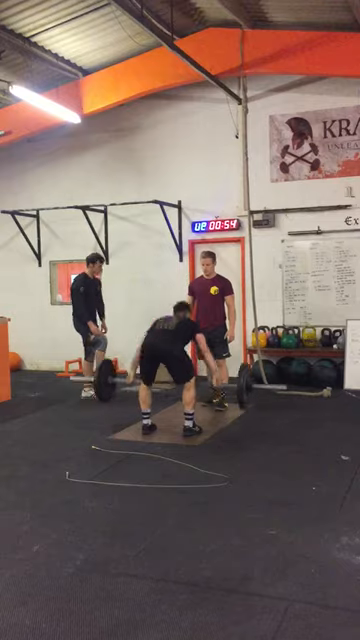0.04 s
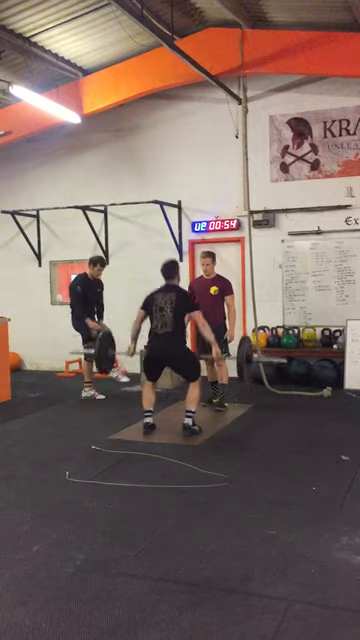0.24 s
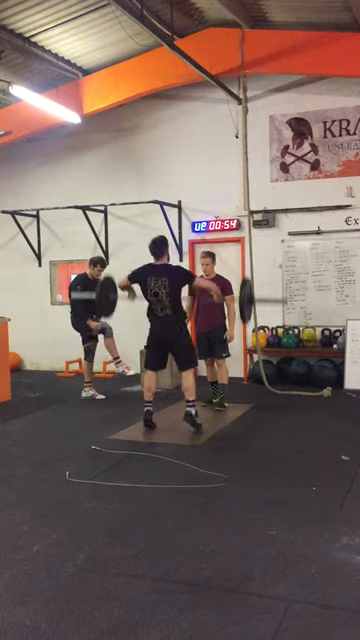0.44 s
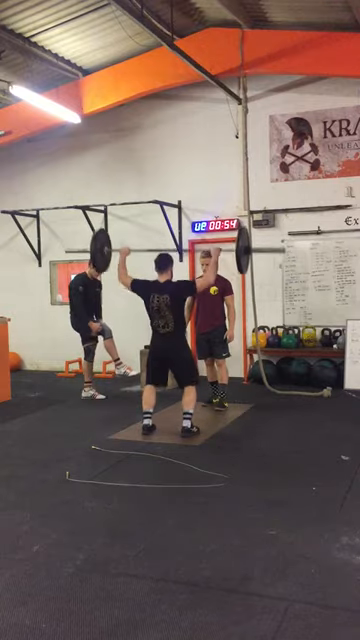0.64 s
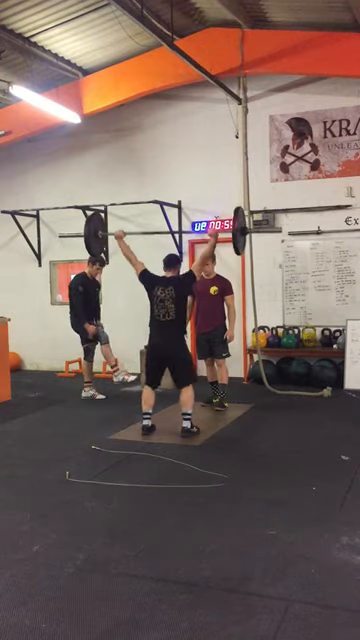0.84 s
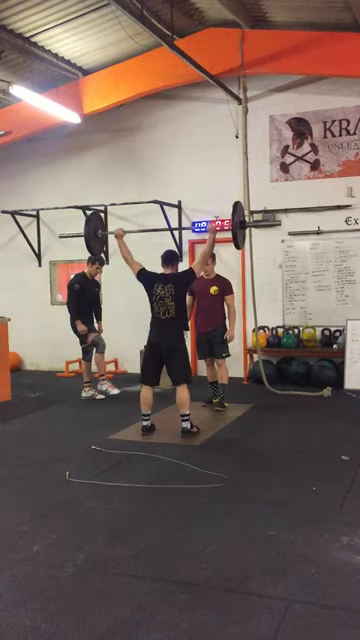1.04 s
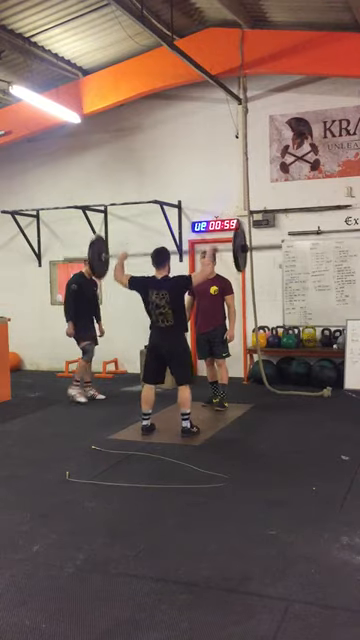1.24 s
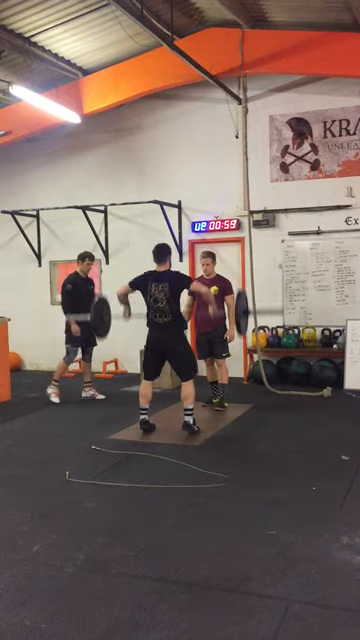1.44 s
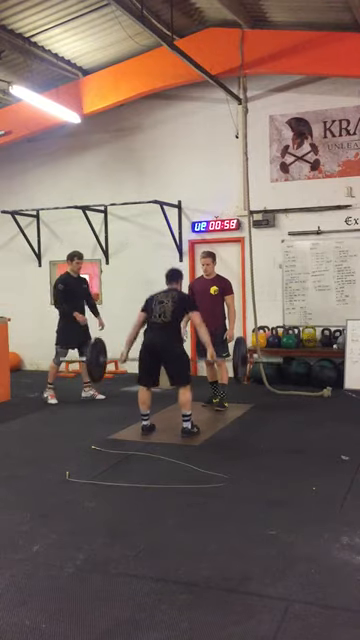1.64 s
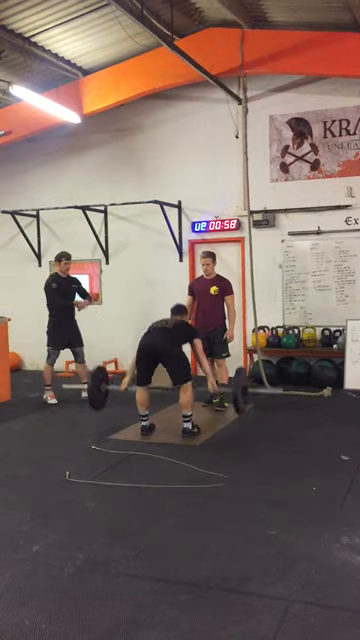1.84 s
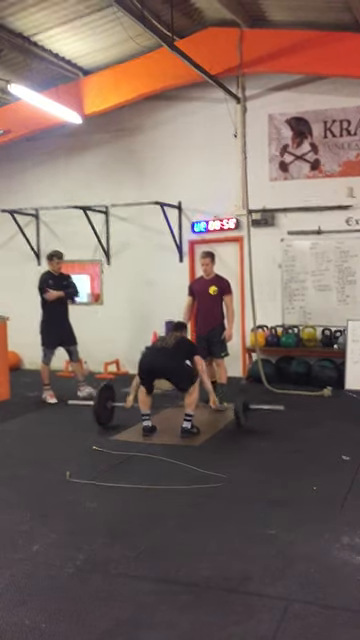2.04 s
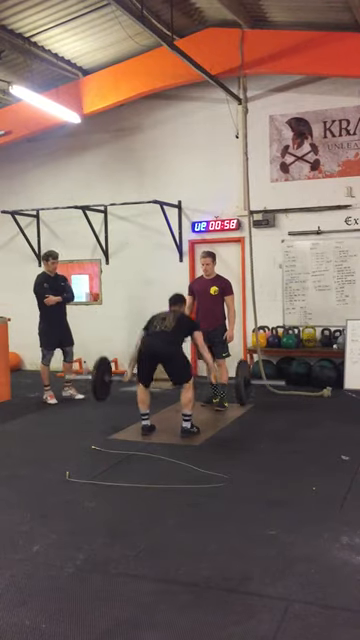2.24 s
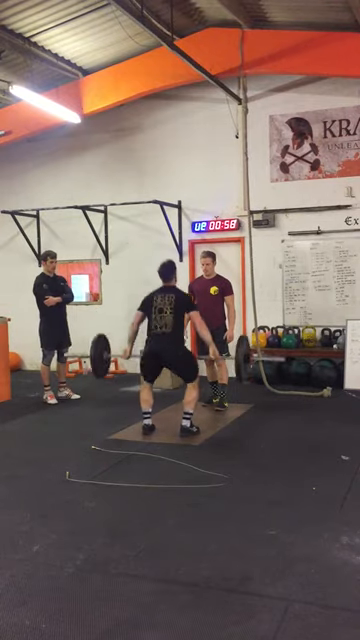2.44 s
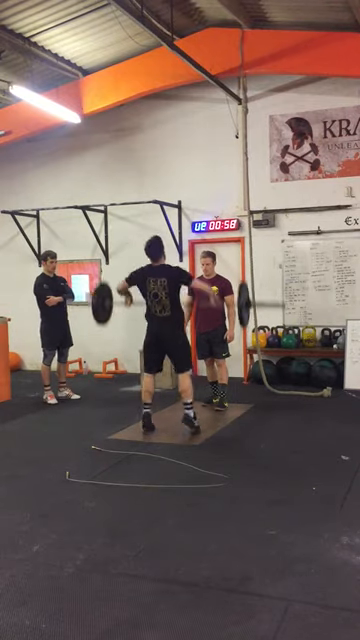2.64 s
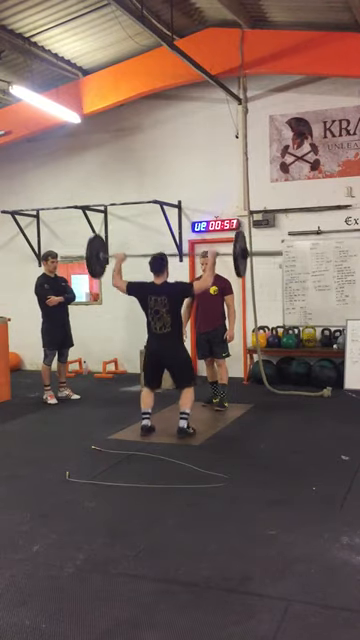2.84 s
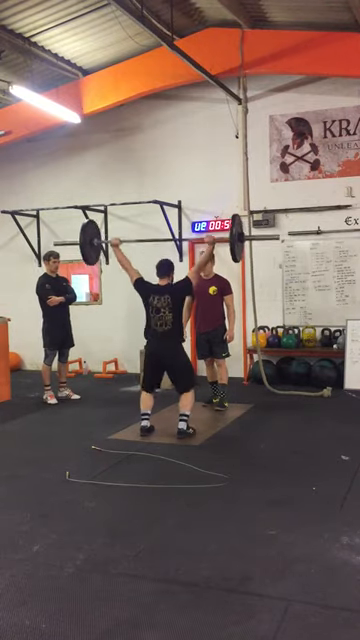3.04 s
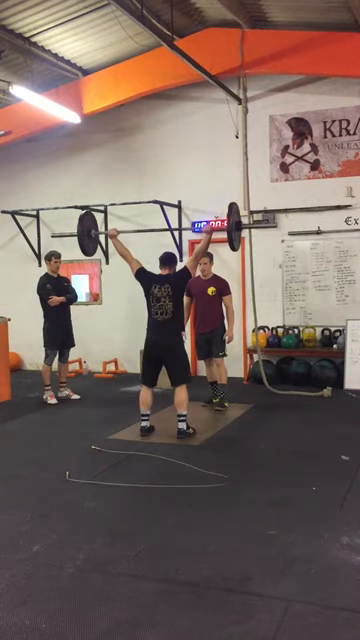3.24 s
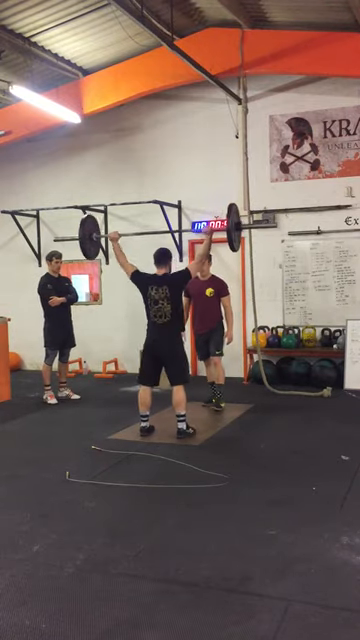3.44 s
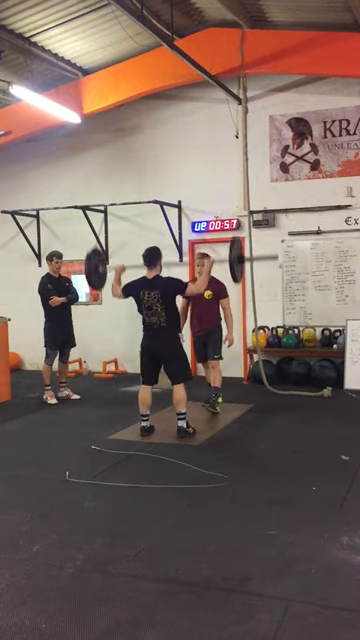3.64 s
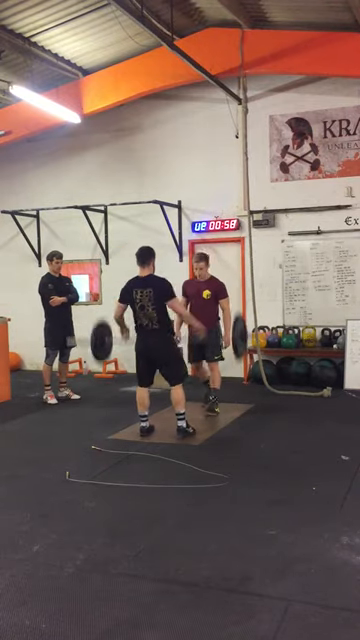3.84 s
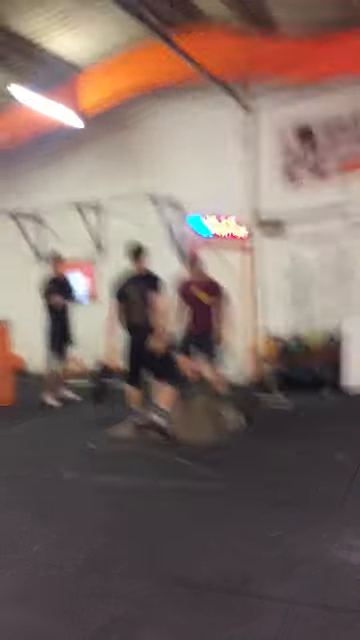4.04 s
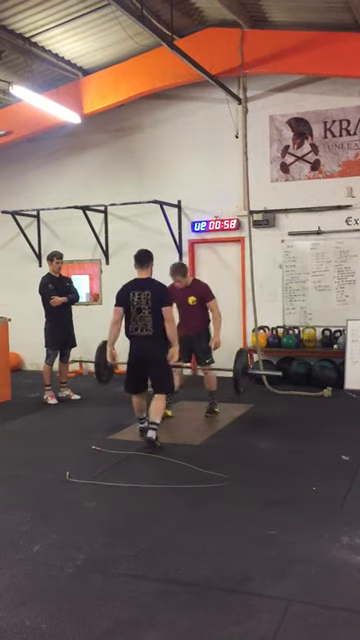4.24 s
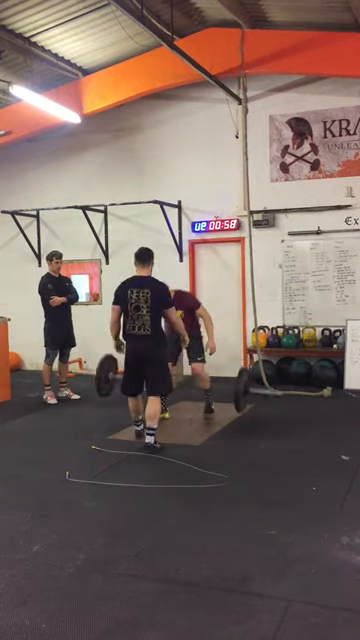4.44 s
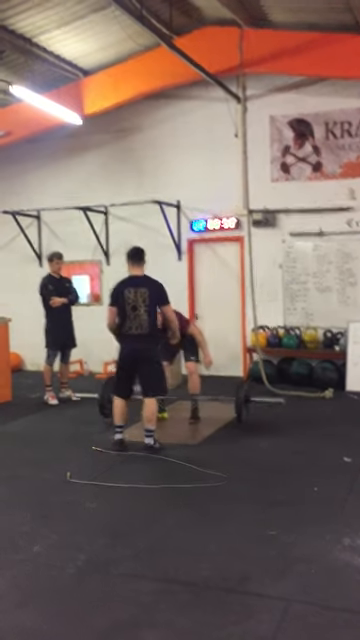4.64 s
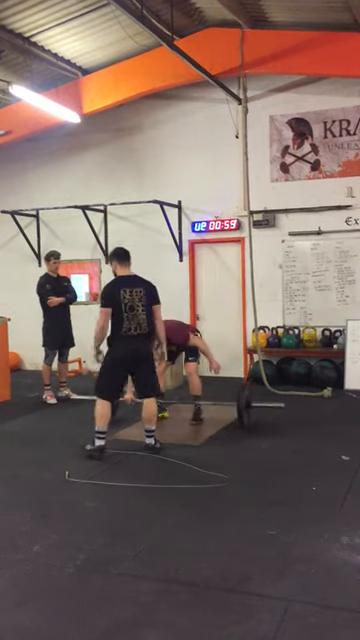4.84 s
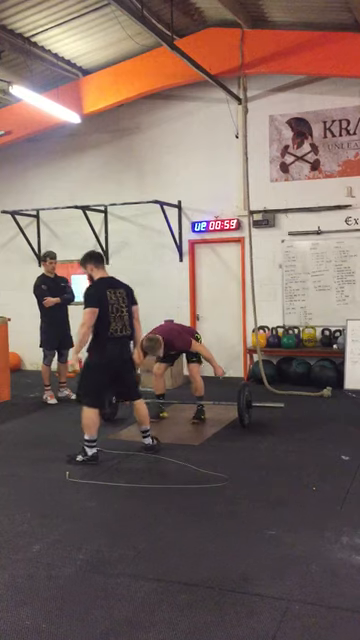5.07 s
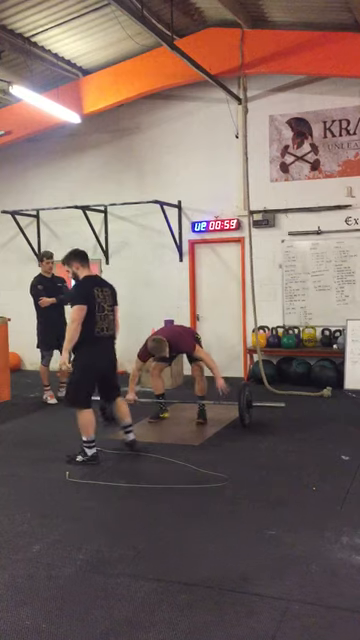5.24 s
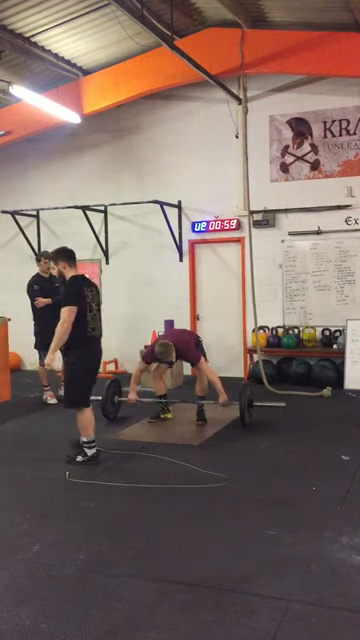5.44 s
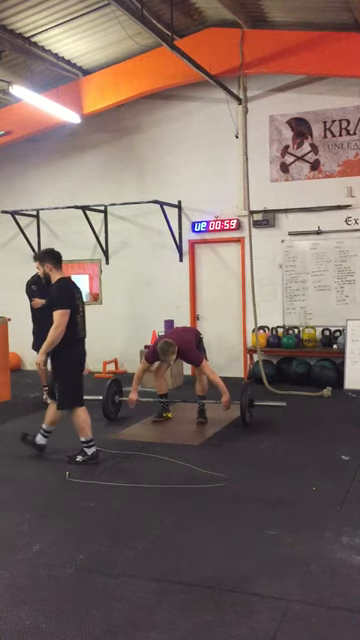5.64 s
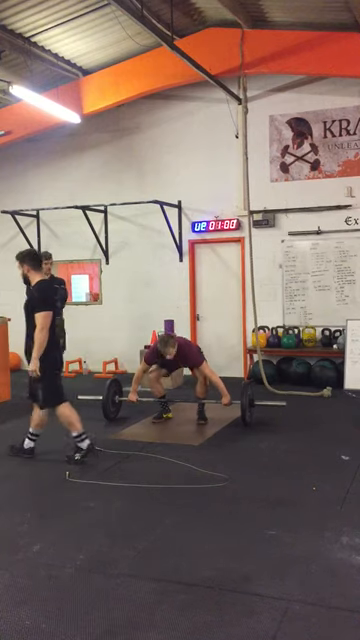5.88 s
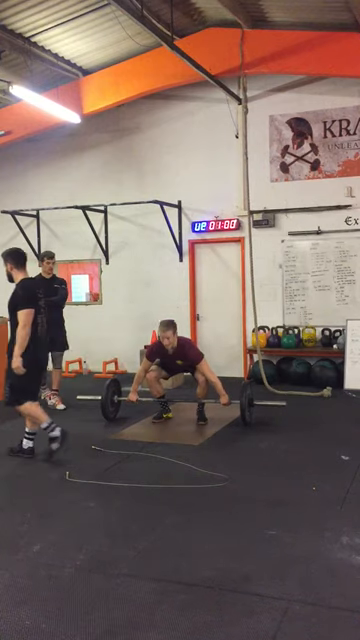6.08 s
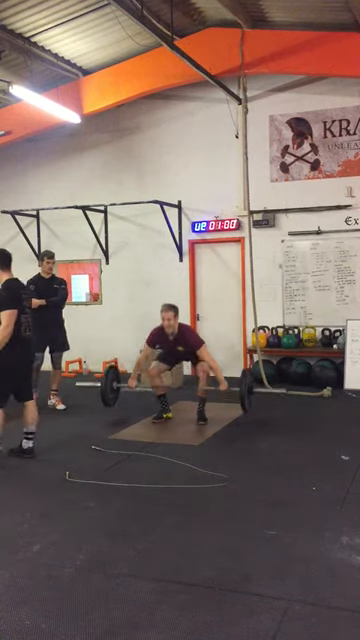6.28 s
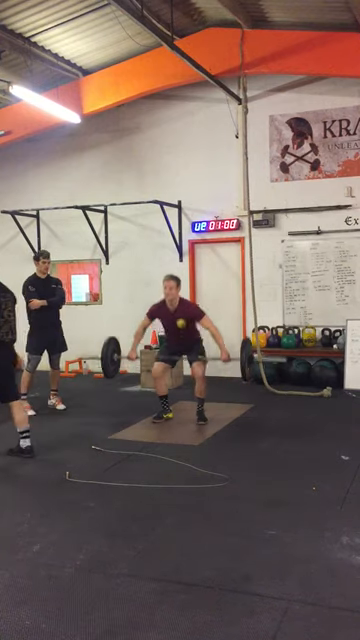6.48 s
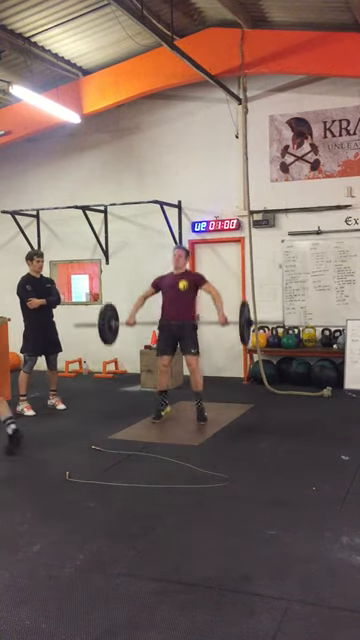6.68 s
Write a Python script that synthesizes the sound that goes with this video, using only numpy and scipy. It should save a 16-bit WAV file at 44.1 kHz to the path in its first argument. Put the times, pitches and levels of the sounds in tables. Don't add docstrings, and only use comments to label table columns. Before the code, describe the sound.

A loaded barbell slams onto a rubber floor three times in a big echoing gym, steel clattering and bouncing, with light jangles between.

```python
import sys
import numpy as np
from scipy import signal
from scipy.io import wavfile
from scipy.ndimage import uniform_filter1d

SR = 44100
rng = np.random.default_rng(int(sys.argv[2]) if len(sys.argv) > 2 else 0)


def persist_wave(psi):
    counts = np.round(np.clip(psi, -1, 1) * 32767).astype(np.int16)
    wavfile.write(sys.argv[1], SR, np.atleast_2d(counts).T)


def amplitude_ratio(level_db):
    exponent = np.asarray(level_db, float) / 20
    return 10 ** exponent


N = 295911
LEAD = 1 / 4

# frequency in Hz, level in dB per Hz.
STEEL_COLOUR = [(290, -28), (500, -13.5), (950, -10.5), (1100, -0.5), (1630, -1), (3010, 1), (4810, -5),
                (5560, -3), (11400, -30.5), (14600, -45), (16400, -44)]
# frequency in Hz, level in dB.
FIZZ_COLOUR = [(4000, -43), (5600, -6.5), (7000, -15), (9000, 1), (11000, -8), (14000, -13.5), (17000, -17)]


def evened(x):
    return x / np.sqrt(np.mean(x ** 2) + 1e-20)


def read(points, hz):
    f, value = np.transpose(points)
    return np.interp(np.log(hz + 1), np.log(f + 1), value)


def track():
    return np.zeros(N + round(LEAD * SR))


def add(mix, s, sound):
    part = mix[round((s + LEAD) * SR):][:len(sound)]
    part += sound[:len(part)]


def colour(x, spectrum):
    hz = abs(np.fft.fftfreq(8192, 1 / SR))
    log_gain = np.log(amplitude_ratio(np.maximum(read(spectrum, hz), -100)))
    taps = np.fft.ifft(np.exp(np.conj(signal.hilbert(log_gain)))).real[:4096]
    return signal.oaconvolve(x, taps / np.linalg.norm(taps))[:len(x)]


def ring(x, modes, widen=1):
    t = np.arange(SR // 4) / SR
    taps = np.zeros(len(t))
    for hz, width, db in modes:
        taps += amplitude_ratio(db) * width * np.exp(-np.pi * width * widen * t) * np.sin(2 * np.pi * hz * t)
    return signal.oaconvolve(x, taps / np.linalg.norm(taps))[:len(x)]


def crowd(size, modes):
    return evened(ring(ring(rng.standard_normal(size), modes), modes))


def thuds():
    # start in seconds, push level in dB, push pitch in Hz,
    # push t60 in seconds, boom level in dB.
    plate_hits = [
        (-.05, -12, 200, .024, -22.5),
        (2.116, -24, 243, .044, -26.5),
        (2.114, -37, 90, .26, -44.5),
        (4.1138, -3.5, 235, 0.074, -15),
        (4.116, -13, 101, .17, -47),
        (4.137, -17, 192, 0.025, -13),
        (4.659, -11.5, 205, 0.076, -29.5),
        (4.712, -35, 194, .066, -17.5),
        (4.91, -23, 184.7, 0.11, -28.5),
    ]
    # frequency in Hz, level in dB per Hz.
    boom_colour = [(15, -48), (25, -20), (59, -2.5), (169, 1.5), (199, -0.5), (241, 0), (419, -7),
                   (454, -13.5), (525, -5.5), (854, -13.5), (1200, -8.5), (1560, -20), (2640, -120)]
    # frequency in Hz, level in dB.
    slap_colour = [(250, -33), (450, -1), (1000, -22), (2000, -10.5), (4000, -17.5), (9000, -18),
                   (17000, -54)]
    slap_db = -4.5
    push, boom, slap, t = track(), track(), track(), np.arange(SR // 2) / SR
    for s, db, hz, t60, boom_db in plate_hits:
        boom_noise, slap_noise = rng.standard_normal((len(t), 2)).T
        cycles = hz * (t + 0.0012 * (1 - np.exp(-t / 0.0021)))
        add(push, s, -amplitude_ratio(db - 60 * t / t60) * np.sin(2 * np.pi * cycles))
        add(boom, s, amplitude_ratio(boom_db + 1 - 60 * t / 0.36) * (1 - np.exp(-t / 0.0041)) * boom_noise)
        add(slap, s, amplitude_ratio(boom_db + slap_db - 60 * t / 0.18) * slap_noise)
    return push, colour(boom, boom_colour) + colour(slap, slap_colour)


def foreruns():
    # start in seconds, level in dB, length in seconds, start pitch in Hz, end pitch in Hz.
    chirps = [
        (2.109, -24, .007, 700, 450),
        (4.108, -11, .0058, 750, 520),
    ]
    out = track()
    for s, db, length, start_hz, end_hz in chirps:
        u = np.arange(round(length * SR)) / (length * SR)
        cycles = np.cumsum(start_hz + (end_hz - start_hz) * u) / SR
        add(out, s, amplitude_ratio(db) * u ** 0.78 * np.sin(2 * np.pi * cycles))
    return out


def clatter():
    # start in seconds, level in dB, hardness 0-1.
    cracks = [
        (0.8227, -24.5, 0.8),
        (2.115, -5, 0.68),
        (4.1138, -11.5, .5),
    ]
    # start in seconds, level in dB,
    # build-up in seconds, hardness 0-1.
    hammerings = [
        (-.05, -10, .002, 0.58),
        (.83, -35.5, 0.0018, 0),
        (2.122, -9, .0027, 0.59),
        (4.124, -2, 0.0054, 0.78),
        (4.659, -3.5, 0.019, 0.79),
        (4.712, -9, 0.015, 0.49),
        (4.906, -15, 0.0043, 0.69),
        (4.957, -12, 0.013, 0.7),
    ]
    # start in seconds, level in dB.
    settles = [
        (.201, -22.5),
        (2.36, -20.5),
        (5.091, -19.5),
        (5.27, -19),
        (5.45, -30),
        (5.68, -45),
    ]
    # frequency in Hz, width in Hz, level in dB.
    bar_modes = [(1250, 390, -2), (2180, 180, -3), (3160, 115, 7.5), (4370, 300, -2), (5490, 210, 0),
                 (6030, 160, -5), (6570, 83, 0.5), (7085, 63, 2.5), (7500, 50, -4), (8070, 65, 1),
                 (8580, 36, 3), (9120, 150, -3.5), (9590, 110, -1.5), (10500, 28, -14.5), (10800, 100, -32),
                 (11320, 68, -44), (12050, 84, -8.5), (12600, 220, -39), (13700, 67, -12), (13300, 91, -15),
                 (14000, 84, -14), (15000, 44, -23.5), (15600, 99, -50)]
    # frequency in Hz, width in Hz, level in dB.
    shaft_modes = [(3035, 45, -3), (3130, 16, -0.5), (3170, 25, 1), (3476, 49, 1.5), (3905, 57, -6),
                   (4180, 35, -7)]
    # start s, level dB, build-up s, t60 s, hardness, share sent to the ringing modes dB
    blows = [(s, db, .0003, 0.067, hard, -0.5) for s, db, hard in cracks]
    blows += [(s, db, rise, 0.35, hard, -1) for s, db, rise, hard in hammerings]
    blows += [(s, db, .03, 0.44, .08, -5.5) for s, db in settles]
    crack, rung, t = track(), track(), np.arange(SR // 2) / SR
    for s, db, rise, t60, hardness, ring_db in blows:
        chance, size, sign = rng.random((len(t), 3)).T
        struck = chance < 9000 / SR
        knocks = evened(struck * amplitude_ratio(-3 * np.log(size + 0.0017)) * (sign - .5))
        knocks = knocks * amplitude_ratio(db - 60 * t / t60) * (1 - np.exp(-t / rise))
        knocks = signal.lfilter([1, -hardness], [1], knocks)
        add(crack, s, knocks)
        add(rung, s, amplitude_ratio(ring_db) * knocks)
    return colour(crack, STEEL_COLOUR) + amplitude_ratio(-6.5) * ring(rung, bar_modes) + amplitude_ratio(-11.5) * ring(rung, shaft_modes)


def spin():
    # frequency in Hz, width in Hz, level in dB.
    bearing_modes = [(2430, 70, -1), (2730, 60, -1), (3170, 130, -2), (4280, 60, 1), (4730, 80, -1),
                     (5140, 80, -1), (5600, 70, 0), (6050, 80, -5), (6550, 100, -7), (6940, 120, -11),
                     (8210, 100, -7), (10100, 350, -14), (10800, 120, -15), (13000, 250, -15),
                     (15100, 250, -21)]
    from_s, top_s, end_s = 3.89, 3.984, 4.104
    top_db, up_db_per_s, sag_db_per_s = -43.5, 291.5, 80
    t = np.arange(from_s, end_s, 1 / SR)
    level_db = top_db + np.minimum(up_db_per_s * (t - top_s), sag_db_per_s * (top_s - t))
    modes = [(hz, width, db / 2) for hz, width, db in bearing_modes]
    hiss = crowd(len(t), modes)
    hiss += amplitude_ratio(1.0) * colour(rng.standard_normal(len(t)), STEEL_COLOUR)
    hiss += amplitude_ratio(-8.5) * colour(rng.standard_normal(len(t)), FIZZ_COLOUR)
    out = track()
    add(out, from_s, amplitude_ratio(level_db - 4.5) * hiss)
    return out


def clinks():
    # start in seconds, level in dB, share of the wide rings in dB, share of the end ring in dB.
    taps = [(.331, -41.5, 1.5, -10.5), (.695, -57, 9, -16), (.8, -57, 4, -6.5), (.899, -60.5, 2.5, 3),
            (1.32, -63, -4, 0), (1.372, -65.5, 14.5, -8), (1.646, -60, -4.5, -6), (1.75, -66, -2, -18),
            (2.692, -57, 2.5, -10.5), (2.84, -53, 7, -16), (2.905, -49, -2, -11), (2.96, -54.5, 3, -13),
            (3.032, -53, -2.5, 1.5), (3.08, -56, 3, -9), (3.14, -57, -8, -1.5), (3.585, -77, 7, -12.5),
            (5.545, -53, 6, .3), (6.3, -60.5, -5, -19)]
    # frequency in Hz, width in Hz, t60 in seconds,
    # level in dB, 1 for the end ring.
    sleeve_bands = [(8190, 120, .12, -7, 0), (9950, 200, .17, 0, 0), (13000, 120, .2, 0, 1),
                    (14100, 132, .12, -12, 0)]
    out, ticks, t = track(), track(), np.arange(SR // 2) / SR
    bands = [crowd(len(out), [(hz, width, 0)]) for hz, width, *rest in sleeve_bands]
    for s, db, *shares_db in taps:
        start = amplitude_ratio(db) * (1 - np.exp(-t / .003))
        add(ticks, s, start * amplitude_ratio(-1 - 60 * t / .08) * rng.standard_normal(len(t)))
        for band, (hz, width, t60, ring_db, end) in zip(bands, sleeve_bands):
            decay = amplitude_ratio(ring_db + shares_db[round(end)] - 60 * t / t60)
            add(out, s, start * decay * band[round(s * SR):][:len(t)])
    return out + colour(ticks, FIZZ_COLOUR)


def jangle():
    # start of the hold in seconds, level in dB, hold in seconds.
    bouts = [
        (0.356, -51, 0.023),
        (.84, -57.5, .02),
        (1.39, -62.5, .01),
        (2.829, -56.5, .27),
        (4.497, -37.5, 0.61),
        (5.349, -57, 0.26),
    ]
    # frequency in Hz, width in Hz, level in dB.
    loose_modes = [(8240, 110, -5), (9890, 230, 1), (10900, 110, -13), (13000, 120, -7),
                   (14100, 120, -18.5)]
    up_db_per_s, down_db_per_s = 249.5, 77.5
    sound = amplitude_ratio(-9) * colour(rng.standard_normal(N), FIZZ_COLOUR)
    for hz, width, db in loose_modes:
        fits = evened(uniform_filter1d(rng.standard_normal(N), size=2500))
        sound += amplitude_ratio(db - 8.0 + 3.2 * fits) * crowd(N, [(hz, width, 0)])
    t = np.arange(N) / SR
    level = np.zeros(N)
    for s, db, hold in bouts:
        rise_db = up_db_per_s * np.maximum(s - t, 0)
        fall_db = down_db_per_s * np.maximum(t - s - hold, 0)
        level += amplitude_ratio(db - rise_db - fall_db)
    out = track()
    add(out, 0, level * sound)
    return out


def collar():
    # start in seconds, level in dB.
    collar_taps = [
        (6.182, -52),
        (6.196, -38),
    ]
    # frequency in Hz, width in Hz, level in dB.
    collar_modes = [(3040, 520, -4), (4530, 500, 2), (5170, 500, 1), (6524, 360, -4), (7930, 180, 2),
                    (9260, 350, -9), (10700, 220, -28), (14500, 400, -20)]
    knocks, t = track(), np.arange(SR // 2) / SR
    for s, db in collar_taps:
        knock = amplitude_ratio(db + 4.0 - 60 * t / 0.02)
        shiver = amplitude_ratio(db - 10.5 - 60 * t / 0.48)
        add(knocks, s, (knock + shiver) * rng.standard_normal(len(t)))
    return ring(knocks, collar_modes, widen=1.2) + amplitude_ratio(-24) * colour(knocks, STEEL_COLOUR)


def steps():
    # start in seconds, level in dB, centre in Hz, width in octaves.
    stomps = [
        (1.151, -39.5, 1380, 0.84),
        (3, -34.5, 700, 1.1),
        (3.27, -49.5, 600, .6),
        (3.48, -55, 597, .55),
        (3.78, -54, 350, .6),
        (1.64, -64.5, 5740, .1),
        (3.585, -69, 6500, .55),
    ]
    # start in seconds, level in
    # dB, centre in Hz, width in octaves.
    scuffs = [
        (-.04, -40.5, 302, 0.59),
        (2.118, -42, 320, 0.47),
        (4.7, -33.5, 446, .7),
        (1.62, -62.5, 349, .8),
        (1.77, -57, 1213, 2.8),
        (3.07, -50.5, 5940, .45),
        (6.12, -54.5, 519, .12),
        (6.56, -63.5, 600, 1.14),
    ]
    out, t, hz = track(), np.arange(SR // 2) / SR, np.geomspace(40, 17000, num=40)
    for rows, rise, t60 in [(stomps, .006, .15), (scuffs, .03, 0.43)]:
        for s, db, centre_hz, octaves in rows:
            band = np.transpose([hz, -12 * (np.log2(hz / centre_hz) / octaves) ** 2])
            puff = amplitude_ratio(db - 60 * t / t60) * (1 - np.exp(-t / rise)) * rng.standard_normal(len(t))
            add(out, s, colour(puff, band))
    return out


def hall_tails(gap=0.017, early_db=3, early_t60=0.19, bend=1.21):
    # frequency in Hz, t60 in seconds.
    hall_t60 = [(40, 2.9), (125, 1.13), (350, 2.93), (700, 1.9), (1500, 2.69), (3000, 2.09), (4200, 1.85),
                (5500, 1.445), (8000, 0.93), (12000, 0.5), (16000, 0.65)]
    hz, t, z = signal.stft(rng.standard_normal((3, 3 * SR)), SR, nperseg=512)
    late = amplitude_ratio(-60 * (t / read(hall_t60, hz)[:, None]) ** bend)
    early = amplitude_ratio(early_db - 60 * t / early_t60)
    tails = signal.istft(z * late * (1 + early), SR, nperseg=512)[1]
    tails = tails * np.clip(np.arange(tails.shape[1]) / SR / gap - .3, 0, 1)
    return tails / np.linalg.norm(tails[0])


def hall(x, turns=1.2946):
    turn = turns * np.arange(len(x)) / SR + np.arange(3)[:, None] / 3
    share = np.sqrt(2 / 3) * np.cos(np.pi * turn)
    return signal.fftconvolve(share * x, hall_tails(), axes=1)[:, :len(x)].sum(axis=0)


def hum():
    # frequency in Hz, level in dB per Hz.
    fan_colour = [(15, -51.5), (25, -5), (102, 8.5), (181, 5), (456, -11), (1150, -9), (1390, -38.5),
                  (1590, -23.5), (2730, -59), (3130, -67), (4830, -31), (15100, -43), (16400, -57.5)]
    # peak in seconds, level in dB, half length in seconds.
    passes = [
        (.25, -42, 0.5),
        (1.792, -52.5, 0.15),
        (3.198, -52, 0.3),
        (4, -50, 0.39),
    ]
    t = np.arange(N) / SR
    lumps = np.zeros(N)
    for f in np.geomspace(1.5, 25, 24):
        lumps += np.sin(2 * np.pi * (f * t + rng.random())) / np.sqrt(f)
    level = amplitude_ratio(-54.5) + sum(amplitude_ratio(db - 9.8 * ((t - s) / half) ** 2) for s, db, half in passes)
    return level * amplitude_ratio(2.0 * evened(lumps)) * colour(rng.standard_normal(N), fan_colour)


def scene():
    push, boom = thuds()
    sources = np.array([clatter(), clinks() + jangle(), spin(), collar(), push, boom, steps()])
    wet_db = [-1.5, -6.0, 2.5, 1.5, -13, -3.0, 2.0]
    mix = sources.sum(axis=0) + hall(amplitude_ratio(wet_db) @ sources) + foreruns()
    return (mix[-N:] + hum())[None]


def hush(x, slope=0.17, most_db=6):
    # frequency in Hz, level in dB.
    threshold = [(200, -110), (1000, -85), (2500, -86), (4500, -74), (7000, -74), (16000, -110)]
    hz, t, z = signal.stft(x, SR, nperseg=1024)
    power = uniform_filter1d(uniform_filter1d(abs(z) ** 2, size=25, axis=1), size=5, axis=2)
    under_db = read(threshold, hz)[:, None] - 10 * np.log10(abs(power) + 1e-20)
    return signal.istft(z * amplitude_ratio(-np.clip(slope * under_db, 0, most_db)), SR, nperseg=1024)[1][:, :N]


def roll_off(x):
    return signal.sosfilt(signal.butter(12, 16530, fs=SR, output="sos"), x)


def record(dry):
    low_cut_hz, ceiling, treble_edge_hz = 45, .69, 15950
    low_cut = signal.butter(3, low_cut_hz, "high", fs=SR, output="sos")
    thin = signal.sosfilt(low_cut, hush(dry))
    thin += amplitude_ratio(-82.0) * rng.standard_normal(thin.shape)
    squeezed = thin / (1 + abs(thin / ceiling) ** 4) ** (1 / 4)
    treble_cut = signal.firwin(511, treble_edge_hz, window=("kaiser", 9), fs=SR)
    edged = signal.oaconvolve(squeezed, treble_cut[None], "same")
    return roll_off(edged)


dry = scene()
out = record(dry)
persist_wave(out)
```